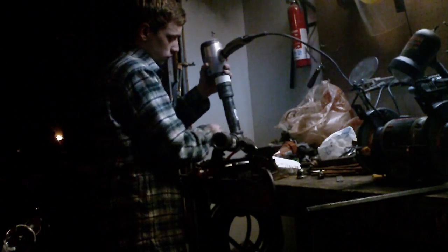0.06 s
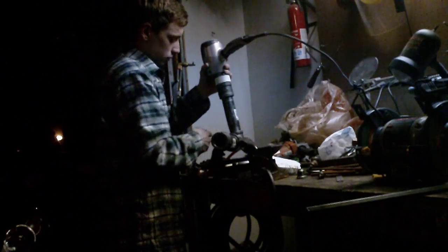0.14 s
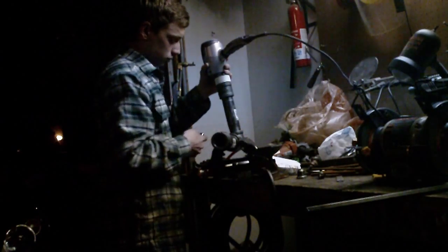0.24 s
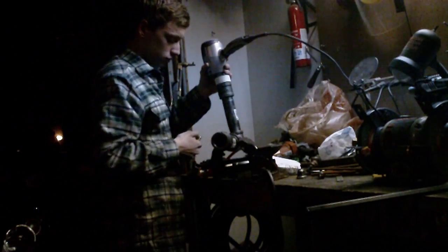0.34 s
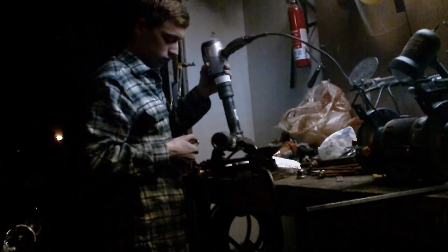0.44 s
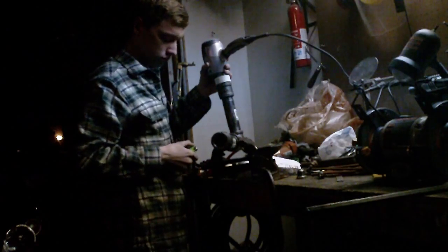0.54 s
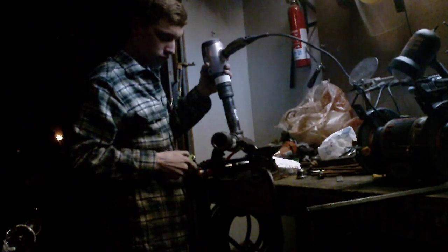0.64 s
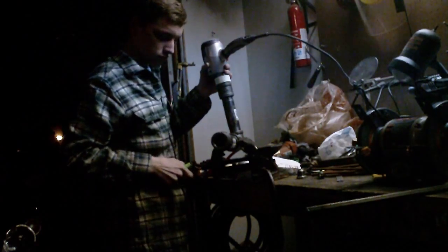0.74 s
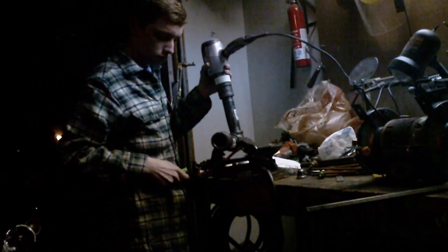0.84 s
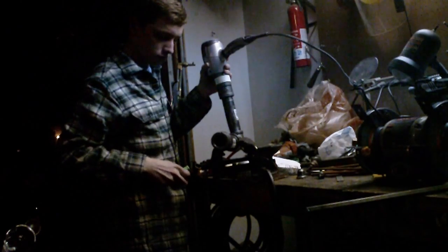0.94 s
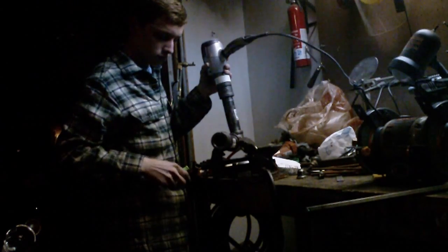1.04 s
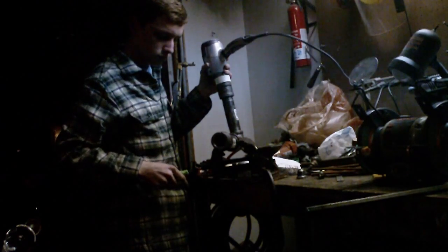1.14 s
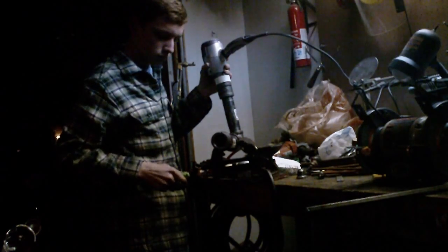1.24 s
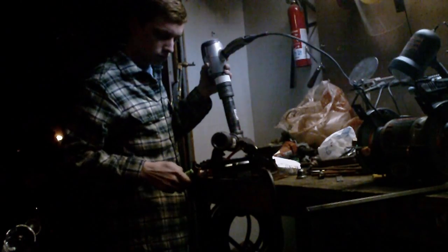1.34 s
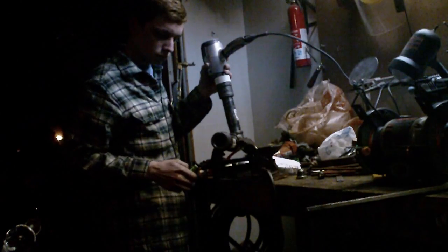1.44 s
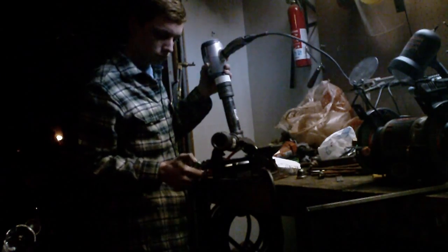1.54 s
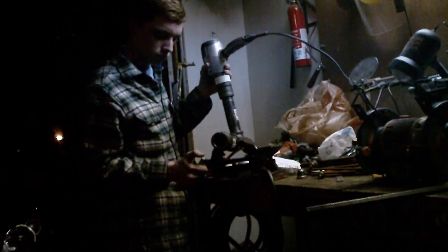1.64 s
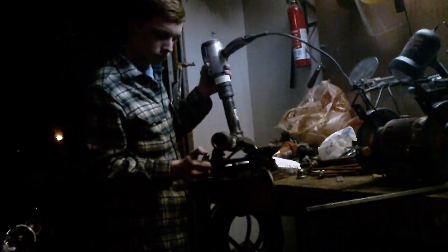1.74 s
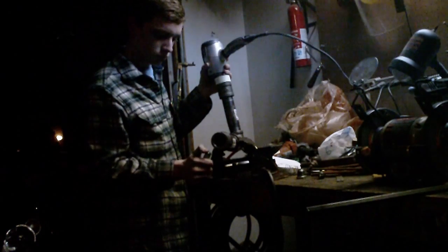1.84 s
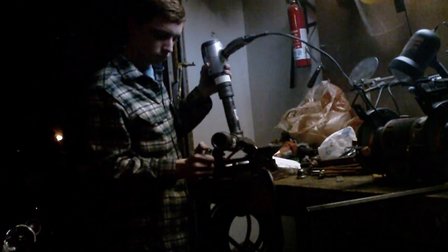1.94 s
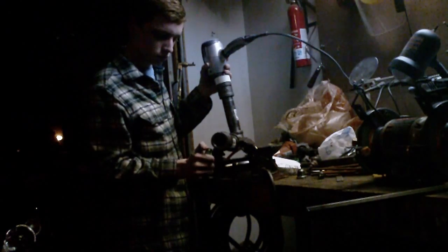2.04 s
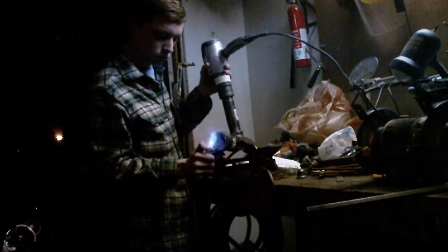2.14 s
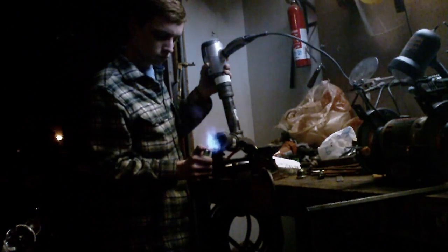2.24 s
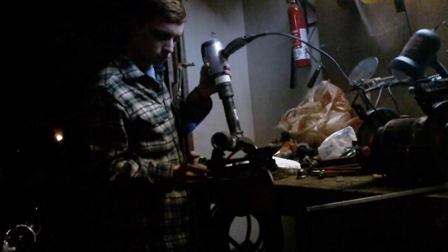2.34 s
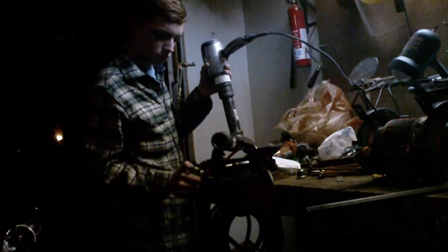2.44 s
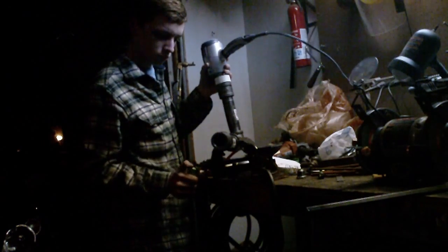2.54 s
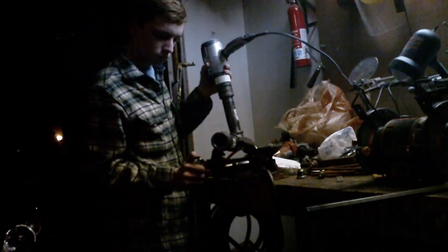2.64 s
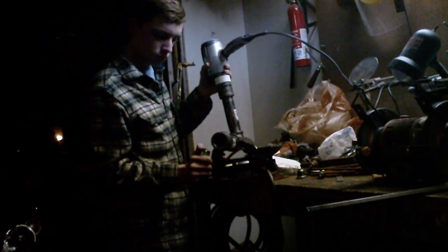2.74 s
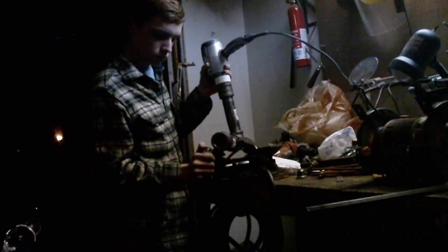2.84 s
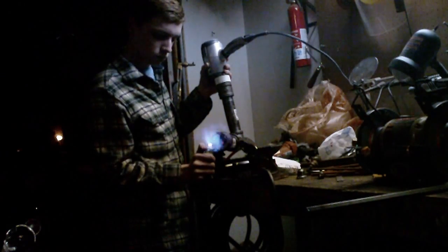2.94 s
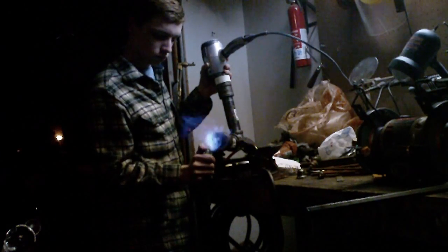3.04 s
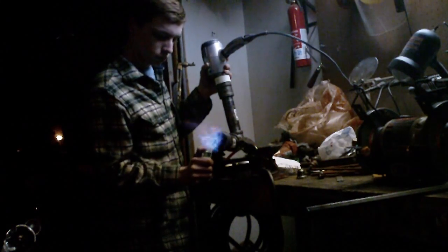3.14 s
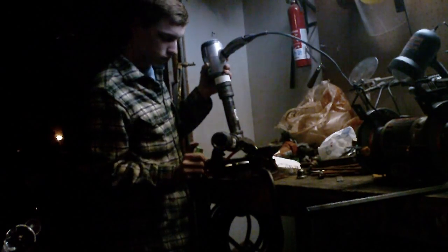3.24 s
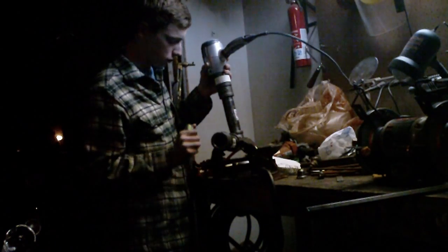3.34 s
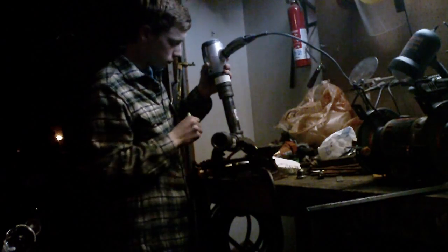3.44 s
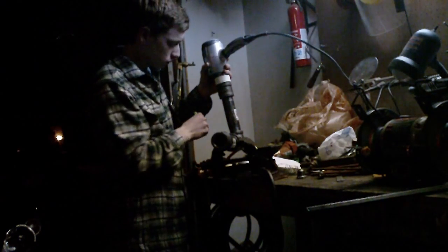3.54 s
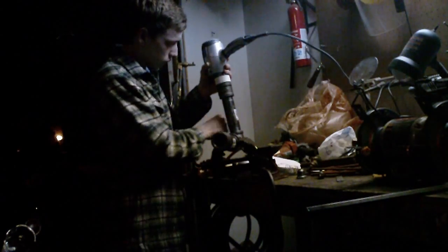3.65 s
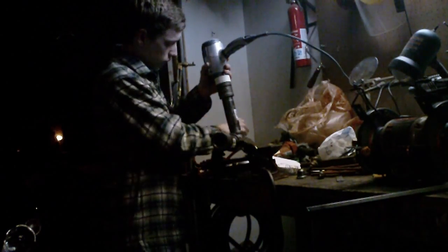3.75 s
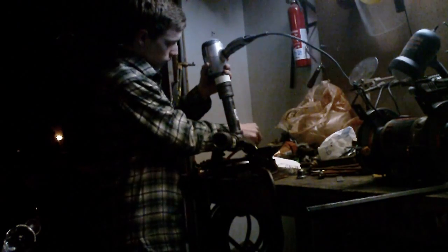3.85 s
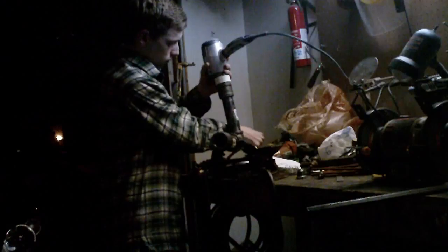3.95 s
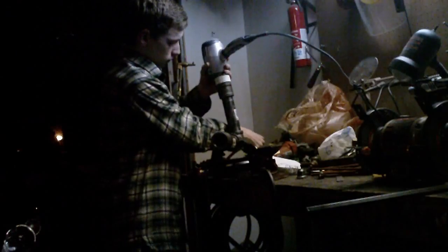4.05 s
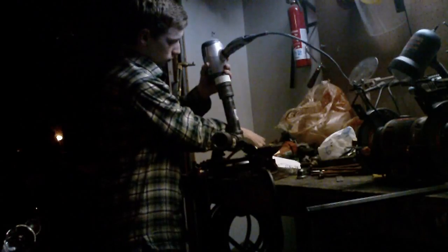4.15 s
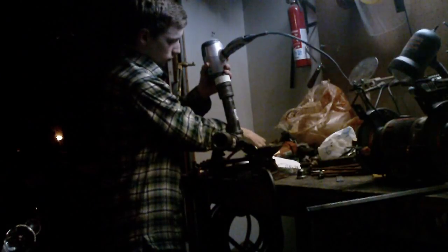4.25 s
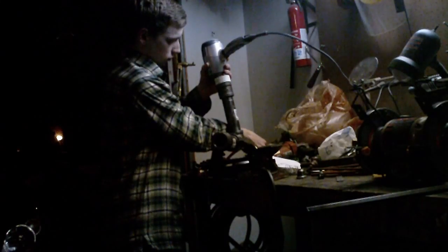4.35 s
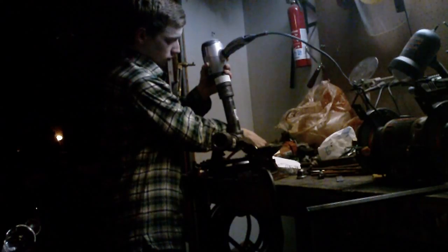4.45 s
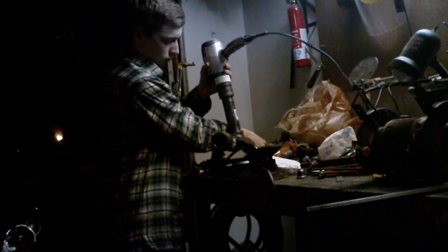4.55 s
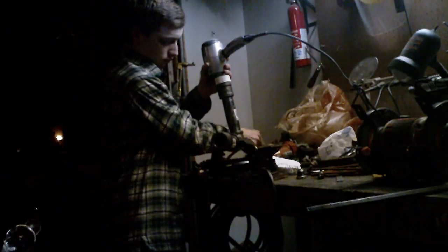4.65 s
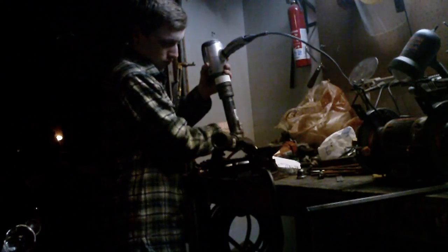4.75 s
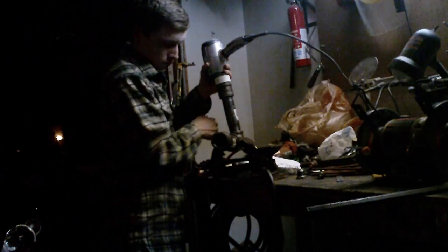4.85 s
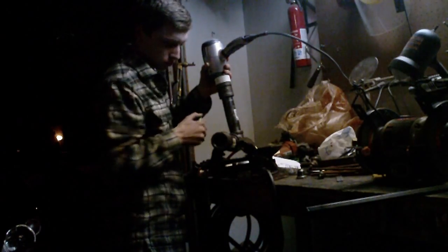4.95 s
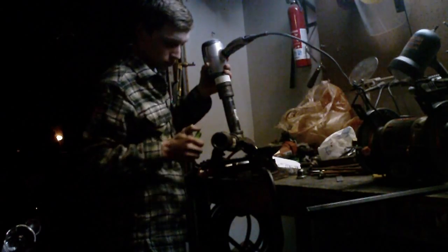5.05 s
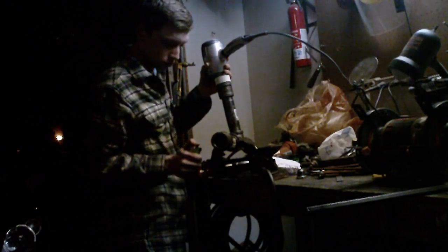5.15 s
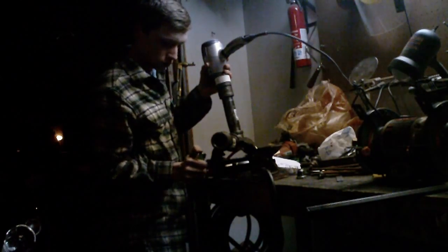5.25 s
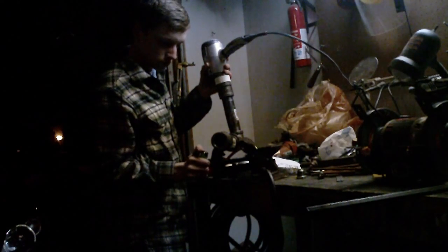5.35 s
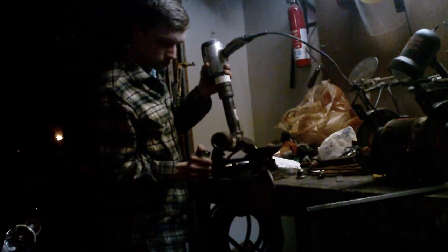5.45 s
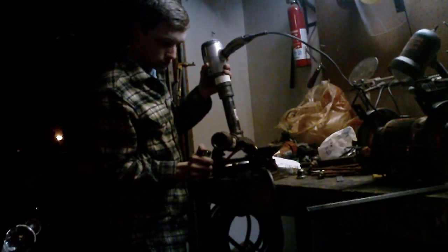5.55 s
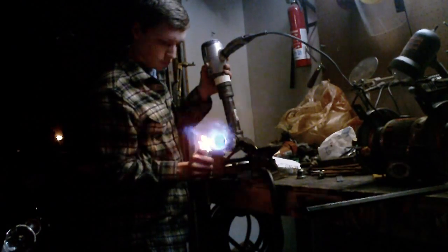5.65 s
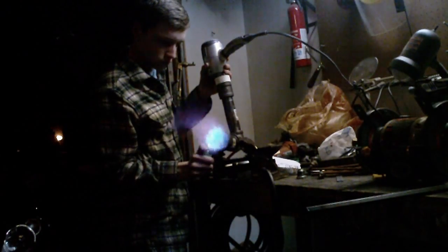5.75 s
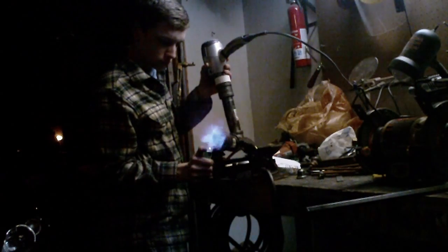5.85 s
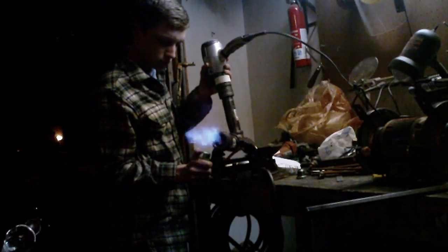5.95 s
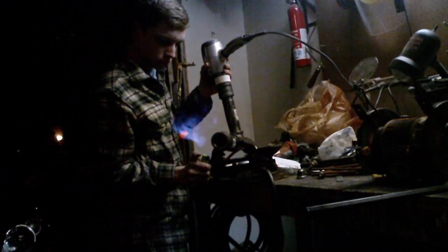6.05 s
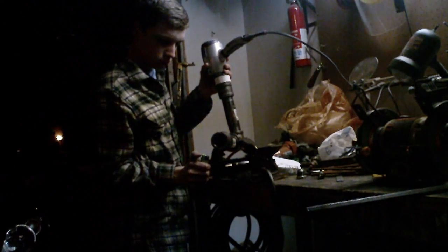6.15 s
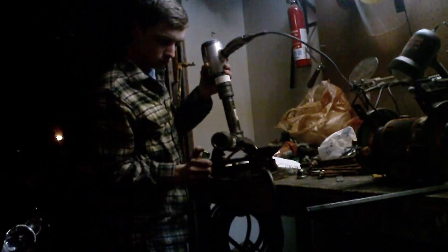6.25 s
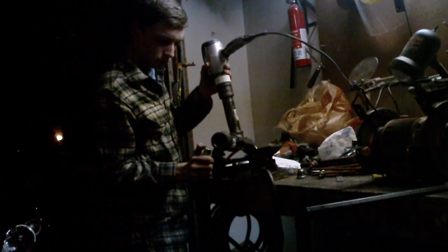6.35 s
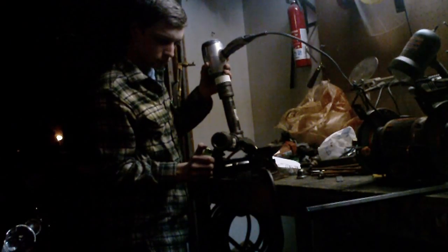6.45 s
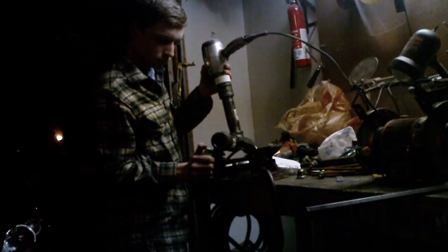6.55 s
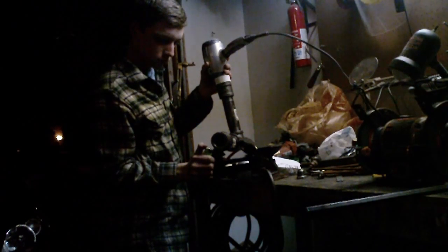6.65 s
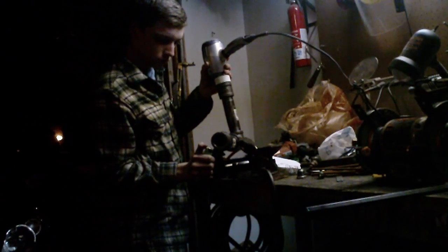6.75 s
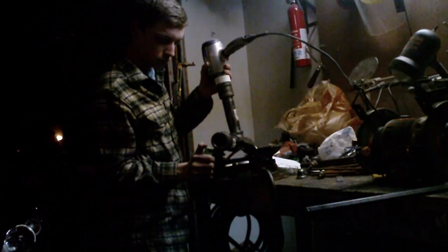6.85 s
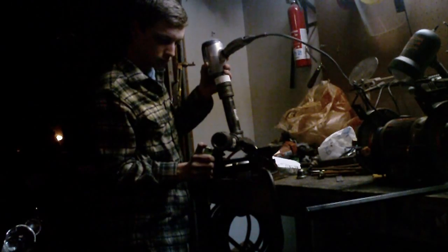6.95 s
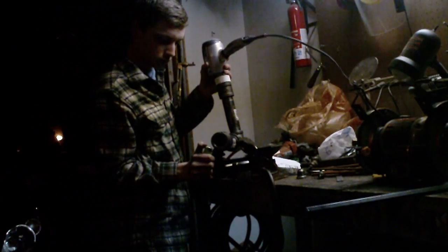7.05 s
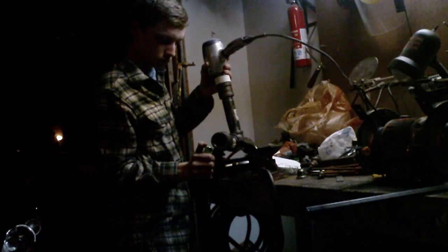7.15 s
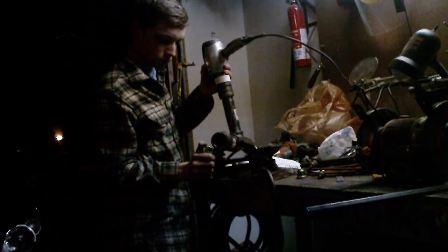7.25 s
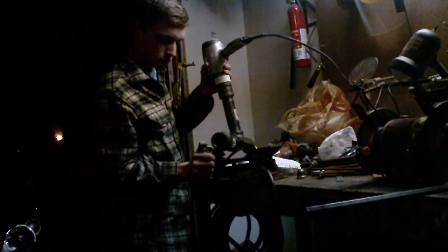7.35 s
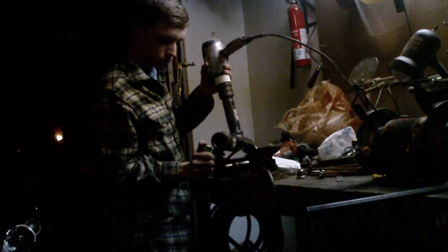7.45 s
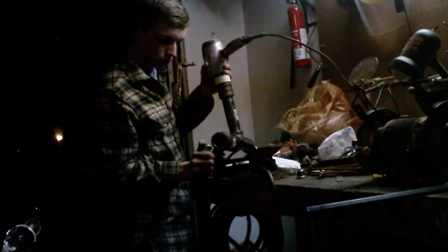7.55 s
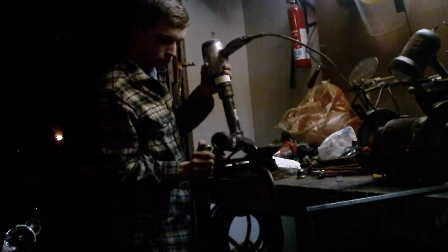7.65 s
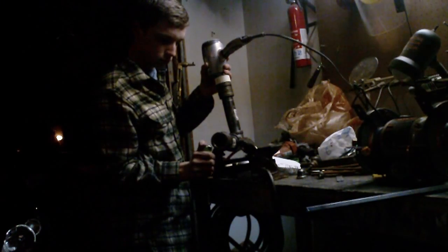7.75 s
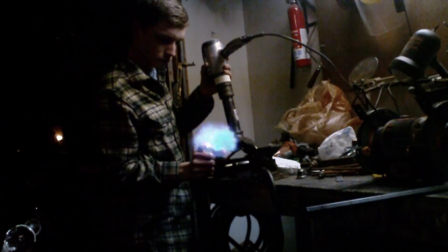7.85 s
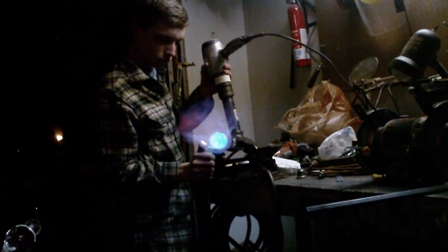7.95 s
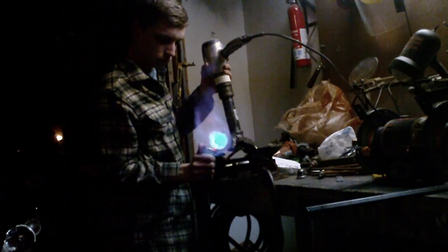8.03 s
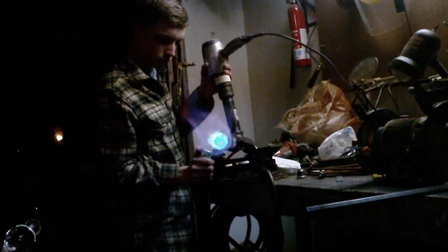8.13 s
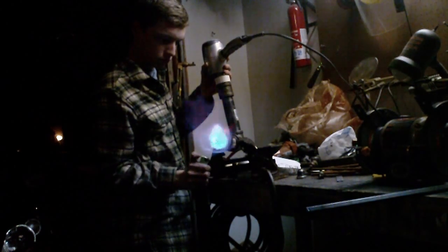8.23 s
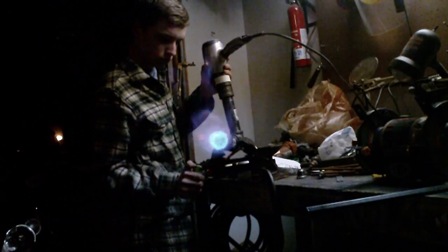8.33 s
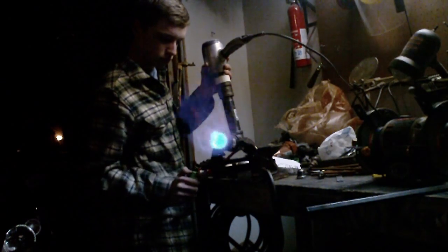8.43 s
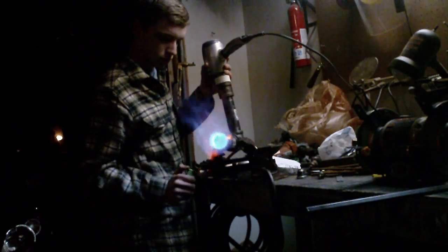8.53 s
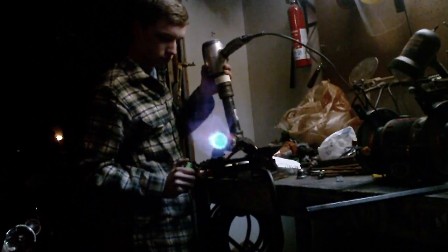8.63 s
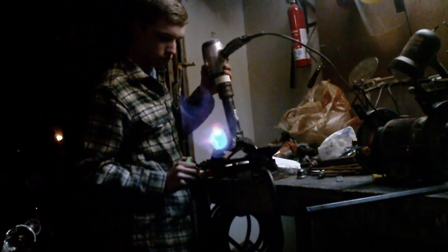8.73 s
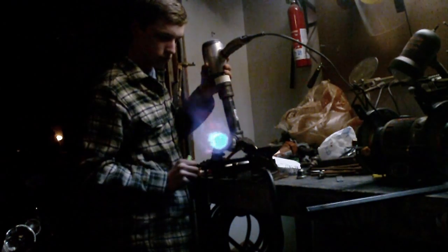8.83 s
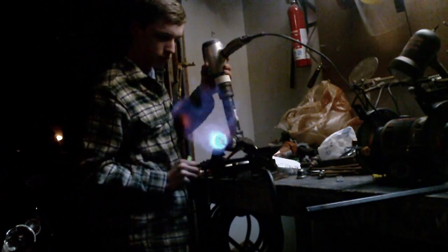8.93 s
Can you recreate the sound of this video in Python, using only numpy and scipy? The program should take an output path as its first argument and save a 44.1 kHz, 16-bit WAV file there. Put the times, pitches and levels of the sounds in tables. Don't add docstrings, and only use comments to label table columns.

```python
import sys
import numpy as np
from scipy import signal
from scipy.fft import rfft, irfft, next_fast_len
from scipy.io import wavfile
from scipy.ndimage import uniform_filter1d, map_coordinates

SR = 44100
rng = np.random.default_rng(int(sys.argv[2]) if len(sys.argv) > 2 else 0)


def to_wav(sig):
    pcm = np.clip(np.atleast_2d(sig), -1, 1) * 32767
    pcm = np.round(pcm).astype(np.int16)
    wavfile.write(sys.argv[1], SR, pcm.T)


def natural_amplitude(level_db):
    exponent = np.asarray(level_db, float) / 20
    return 10 ** exponent


N = 396459
CLOCK = np.arange(N) / SR


def unit(x):
    return x / np.sqrt(np.mean(x ** 2) + 1e-20)


def ramp(start_s, length_s):
    return np.clip((CLOCK - start_s) / length_s, 0, 1)


def wobble(rate):
    knots = rng.standard_normal(int(N * rate / SR) + 4)
    return map_coordinates(knots, [CLOCK * rate])


def patches(shape, bins, frames):
    field = uniform_filter1d(rng.standard_normal(shape), size=bins, axis=0)
    return unit(uniform_filter1d(field, size=frames, axis=1))


def bumps(modes, hz):
    return sum(db * np.exp(-2 * ((hz - center) / width) ** 2) for center, width, db in modes)


def filtered(x, db_of):
    m = next_fast_len(len(x) + 8192)
    gain = natural_amplitude(db_of(np.fft.rfftfreq(m, 1 / SR)))
    return irfft(rfft(x, m) * gain, m)[:len(x)]


def rush(spectrum, modes, patchy_db):
    z = signal.stft(rng.standard_normal(N), nperseg=512)[2]
    gain = natural_amplitude(patchy_db * patches(z.shape, bins=8, frames=10))
    air = signal.istft(z * gain, nperseg=512)[1][:N]
    f, db = np.transpose(spectrum)
    return unit(filtered(air, lambda hz: np.interp(np.log(hz + 1), np.log(f), db) + bumps(modes, hz)))


def garage(x, ripple_db):
    hz, _, z = signal.stft(x, SR, nperseg=4096)
    comb = patches(z.shape, bins=3, frames=50)
    depth_db = ripple_db * np.clip(hz / 9000, .2, 1.2)[:, None]
    return signal.istft(z * natural_amplitude(depth_db * comb), SR, nperseg=4096)[1][:N]


# (frequency [Hz], density [dB per Hz])
RUMBLE = [(15, -25), (30, -12), (60, 5), (120, -3), (200, -16.5)]


def rumble():
    level_db = -61.5 + 1 * CLOCK
    return natural_amplitude(level_db) * rush(RUMBLE, [], patchy_db=2.5)


# (frequency [Hz], density [dB per Hz])
DRYER = [(80, -51), (130, -20.5), (220, -17), (420, -11.5), (470, -5.5), (850, -1.5), (1100, -6),
         (2000, -7), (4000, -9.5), (7500, -12), (10000, -28), (16000, -31)]
# (frequency [Hz], width [Hz], level [dB])
PIPE = [(215, 52, -7.6), (258, 42, 10.5), (436, 18, -7.0), (460, 15, 6.4), (525, 57, 10.5), (702, 83, 7.2),
        (753, 21, -10.8), (781, 11, 11.3), (811, 91, 6.5), (859, 11, -8.8), (887, 26, 5.2), (929, 19, 3.8),
        (1039, 14, 5.2), (1290, 15, -6.4), (1444, 52, -4.0), (1504, 20, 4.9), (1603, 150, 2.1),
        (2009, 25, 3.1), (2117, 26, 4.8), (2184, 12, -4.9), (2340, 150, 2.4), (2527, 28, -6.3),
        (2570, 25, 3.1), (2614, 12, 5.1), (2781, 113, 2.9), (3059, 84, -2.5), (3340, 132, 4.5),
        (3382, 11, -5.8), (3406, 24, 2.4)]
# (frequency [Hz], width [Hz], level [dB])
WALLS = [(3707, 44, 3.6), (3961, 105, 6.7), (4312, 38, 8.4), (4645, 26, -4.2), (4790, 70, 12),
         (5121, 67, -3.2), (5197, 38, 5.5), (5283, 69, 9.9), (5466, 77, -6.4), (5615, 104, 4.2),
         (5873, 36, 4.3), (5947, 28, -7.6), (5986, 122, 9.6), (6017, 45, -6.2), (6098, 25, 6),
         (6241, 21, -4.9), (6483, 29, 4.5), (6874, 25, 5.5), (7084, 47, -4.6), (7291, 186, 5.2),
         (7442, 26, 4.2), (7584, 87, -5.9), (7917, 96, 9.1), (8032, 41, 5.3), (8121, 105, -4.3),
         (8292, 63, 8.3), (8349, 45, 7.2), (8424, 33, -5.9), (8536, 105, -4.5)]
# (frequency [Hz], width [Hz], level [dB])
SHEEN = [(8841, 119, 6.6), (9148, 55, -4.0), (9569, 115, -3.8), (9746, 240, 6.2), (9907, 64, -4.9),
         (10062, 50, -6.2), (10133, 105, 3.7), (10282, 67, 8.6), (10497, 68, -5.8), (10729, 184, 7.3),
         (11578, 74, 4.2), (11771, 22, 6.0), (11899, 109, 7.1), (11928, 35, -5.2), (12098, 165, 3.3),
         (12202, 44, -10.3), (12286, 105, 3.8), (12352, 40, 5.3), (12386, 35, -8.0), (12512, 62, 4.0),
         (12808, 71, 4.4), (13084, 41, 2.9), (13268, 142, 5.1), (13791, 240, 3.5), (13998, 76, -9.4),
         (14247, 79, 7.6), (14446, 50, -2.6), (14750, 79, 4.6)]
# (frequency [Hz], wander [Hz], level [dB])
TONES = [
    (780, 1.43, -39.5),
    (1253, 1.22, -39),
    (4820, 5.87, -36.5),
]


def dryer():
    air = natural_amplitude(-20.5) * rush(DRYER, PIPE + WALLS + SHEEN, patchy_db=0.66)
    out = garage(air, ripple_db=2.5)
    for hz, wander, db in TONES:
        level_db = db + 4.5 + 0.83 * wobble(6.4)
        phase = 2 * np.pi * np.cumsum(hz + wander * wobble(6)) / SR
        out += natural_amplitude(level_db) * np.sin(phase)
    return out


def hush(lag_s):
    fall_s, return_s = .03, .08
    return sum(db * (ramp(lit - fall_s, fall_s) - ramp(gone + lag_s, return_s))
               for lit, gone, _, _, db in BURNS)


# (frequency [Hz], density [dB per Hz])
LOWER = [(800, -48), (2000, -6), (3200, -6.5), (4500, -6), (5400, -1.5), (6200, 0), (6700, -3.5),
         (7200, -14)]
BODY = [(6100, -27), (6600, -9), (7000, -3.5), (7800, -3), (8600, -10.5), (10500, -40), (12000, -47)]
FIZZ = [(8000, -36), (9500, -0.5), (11000, 0.5), (12000, 4.5), (13300, 10), (14300, 3), (14950, -1),
        (15150, 6), (16000, 3.5)]
# (time [s], gas flow [dB], aim towards the pipe mouth [dB])
JET = [(0, 0, 4), (.5, -0.5, 1), (1, 0, 3), (1.4, 0.5, -1), (1.8, 0.5, -0.5), (2.17, 1, -2), (2.8, 3, 0),
       (3.75, 1.5, -2), (4.5, 1, -2), (4.66, 1.5, 9), (4.85, 2, 1.5), (5.5, 1.5, 4.5), (5.9, -2, 4),
       (6.3, 2, 3), (6.7, 1, 2), (7.4, 0, 0.5), (7.93, 1.5, 2), (8.99, 3, 0)]


def gas():
    s, flow, aim = np.transpose(JET)
    flow_db, aim_db = np.interp(CLOCK, s, flow), np.interp(CLOCK, s, aim)
    flutter_db = 0.3 * wobble(9) + 0.38 * wobble(25)
    body_hush_db, fizz_hush_db = hush(lag_s=0.05), hush(lag_s=0.022)
    lower_db = -22 + 0.38 * flow_db + 0.29 * aim_db + 0.52 * body_hush_db + flutter_db
    body_db = -24 + 0.79 * flow_db - 0.5 * aim_db + 0.89 * body_hush_db + flutter_db
    fizz_db = -26.5 + flow_db + 1.03 * fizz_hush_db + flutter_db
    lower = natural_amplitude(lower_db) * rush(LOWER, PIPE + WALLS, patchy_db=0.9)
    body = natural_amplitude(body_db) * rush(BODY, WALLS + SHEEN, patchy_db=1.2)
    fizz = natural_amplitude(fizz_db) * rush(FIZZ, SHEEN, patchy_db=1.3)
    return garage(lower + body + fizz, ripple_db=1.6)


# (time [s], peak level [dB])
RELEASE = (8.112, -21)


def release():
    s, db = RELEASE
    scrape = filtered(rng.standard_normal(N), lambda hz: bumps([(4800, 300, 50)], hz) - 50)
    return natural_amplitude(db) * unit(scrape) * np.exp(-.5 * ((CLOCK - s) / 0.014) ** 2)


# (time [s], peak level [dB], rebound delay [s], rebound level [dB], room level [dB])
SNAPS = [
    (2.1693, 2, .0034, -3, -16),
    (2.999, 1.5, .0033, -.5, -17),
    (5.7123, 1.5, .0035, -1.5, -16),
    (7.9352, 1, .0035, -1, -17),
]
# (frequency [Hz], level [dB], decay by 60 dB [s])
LIGHTER = [(1900, -11, .01), (2300, -6, .014), (2650, -6, .012), (3150, -7, .006), (3700, -6, .006),
           (4300, -4, .01), (4850, -2, .012), (5350, -1, .01), (5800, -6, .008), (7700, -6, .008),
           (9400, -12, .005), (10200, -11, .005), (13700, -9, .005)]


def lighter():
    out, t = np.zeros(N + SR), np.arange(SR // 4) / SR
    for s, db, delay, rebound_db, room_db in SNAPS:
        for at, hit_db in ((s, db), (s + delay, db + rebound_db)):
            ring = np.zeros(len(t))
            for hz, level, t60 in LIGHTER:
                decay = natural_amplitude(level + rng.normal(0, 1) - 60 * t / t60)
                ring += decay * np.sin(2 * np.pi * (hz * t + .3 * rng.random()))
            ring *= 1 - np.exp(-t / .00025)
            ring /= np.abs(ring).max()
            out[round(at * SR):][:len(t)] += natural_amplitude(hit_db) * ring
        echoes = rng.standard_normal(len(t)) * natural_amplitude(-60 * t / 0.31) * (1 - np.exp(-t / 0.0024))
        room = signal.fftconvolve(echoes, ring / np.linalg.norm(ring))[:len(t)]
        out[round(s * SR):][:len(t)] += natural_amplitude(db + room_db) * room
    return filtered(out[:N], lambda hz: 90 * np.log10(np.clip(hz / 1950, 1e-4, 1)))


# (frequency [Hz], density [dB per Hz])
ROAR = [(20, -40), (40, -28), (85, -29), (105, -7.5), (135, -15.5), (170, -4.5), (340, -1.5), (420, -5),
        (700, -11.5), (1500, -34)]
CRACKLE = [(200, -9.5), (450, -4), (800, -7.5), (1250, -6.5), (1500, -13), (2500, -14.5), (5000, -30.5),
           (9000, -44)]
# (frequency [Hz], width [Hz], level [dB])
FIREBOX = [(188, 46, 11.2), (195, 19, -7.6), (252, 28, 10), (275, 15, -5), (310, 44, 5.5), (369, 17, -4.2),
           (402, 29, -8.2), (441, 22, -6.9), (469, 20, 5.5), (515, 60, 3.4), (614, 23, -5.2),
           (686, 60, -2.3), (729, 36, 5.1), (785, 42, 7.3), (828, 18, 3.8), (866, 19, -3.6),
           (1039, 20, 4.6), (1172, 19, 3.1), (1240, 45, 5.2), (1391, 19, -3.9)]
# (catches [s], blows out [s], roar level [dB], push level [dB], hush of the hiss [dB])
BURNS = [
    (2.205, 2.442, -27.5, -11, -6),
    (3.043, 3.28, -25.5, -13, -7.5),
    (5.759, 6.142, -21.5, -0.5, -7.5),
    (7.968, 9.5, -16.5, 7, -14),
]
# (time [s], level over the roar [dB])
SURGES = [(2.245, 4), (2.275, -3), (2.33, 9.5), (3.075, 4), (3.115, -3), (3.195, 7), (5.79, 4), (5.86, 5),
          (5.935, 4), (5.98, -3), (6.045, 3), (6.09, 2.5), (6.125, -5), (8.03, 5), (8.2, 4.5), (8.3, -1),
          (8.54, 2.5), (8.68, -1), (8.75, 3.5), (8.87, 5.5), (8.93, -2), (8.98, 2.5)]


def flame():
    out, surge_s, flare_s = np.zeros(N), 0.02, 0.014
    surge_db = sum(db * np.exp(-.5 * ((CLOCK - s) / surge_s) ** 2) for s, db in SURGES)
    roar = natural_amplitude(surge_db) * rush(ROAR, FIREBOX, patchy_db=-1.3)
    crackle = natural_amplitude(-3 + 0.23 * surge_db) * rush(CRACKLE, FIREBOX + WALLS, patchy_db=2.2)
    t = np.arange(SR // 10) / SR
    push = np.sin(2 * np.pi * 250 * t) * natural_amplitude(-60 * t / 0.037)
    push += 0.1 * np.sin(2 * np.pi * 60 * t) * natural_amplitude(-60 * t / 0.1)
    push *= 1 - np.exp(-t / 0.0023)
    for lit, gone, roar_db, push_db, _ in BURNS:
        fading_db = -230 * np.maximum(CLOCK - gone, 0)
        out += ramp(lit - flare_s / 2, flare_s) * natural_amplitude(roar_db + fading_db) * (roar + crackle)
        out[round(lit * SR):][:len(t)] += natural_amplitude(push_db) * push
    return out


DUCKS_DB = [
    -6,
    -4.5,
    -4,
    -9.5,
]


def camera_gain():
    gain_db, duck_s, recover_s = np.zeros(N), 0.015, 0.43
    for snap, db in zip(SNAPS, DUCKS_DB):
        recovery = np.exp(-np.maximum(CLOCK - snap[0], 0) / recover_s)
        gain_db += db * ramp(snap[0] + 0.0058, duck_s) * recovery
    return natural_amplitude(gain_db)


def scene():
    ducked = rumble() + dryer() + gas() + release() + flame()
    return np.array([camera_gain() * ducked + lighter()])


def band_limit(x):
    return signal.sosfilt(signal.butter(12, 15320, fs=SR, output="sos"), x)


# (frequency [Hz], width [Hz], level [dB])
PORT = (11245, 250, -27)


def record(dry):
    x = dry[0] / (1 + np.abs(dry[0] / .95) ** 6) ** (1 / 6)

    def response_db(hz):
        low_cut_db = 40 * np.log10(np.clip(hz / 45, 1e-4, 1))
        high_cut_db = -120 * (hz > 15320)
        return bumps([PORT, (11000, 1200, -8)], hz) + low_cut_db + high_cut_db

    mix = filtered(x, response_db)[None]
    return band_limit(mix)


dry = scene()
out = record(dry)
to_wav(out)
```